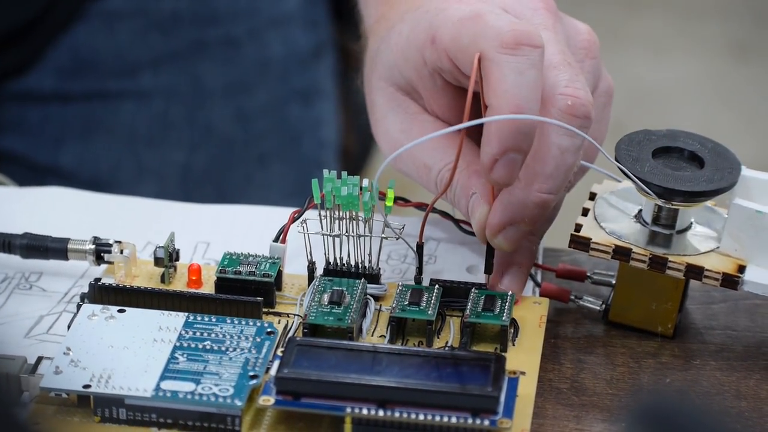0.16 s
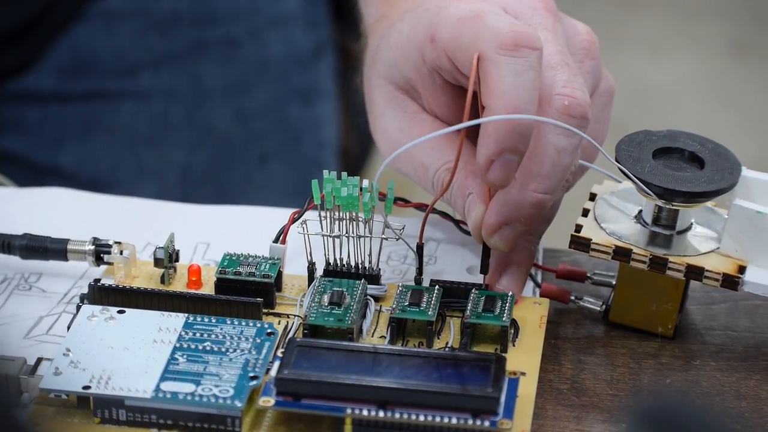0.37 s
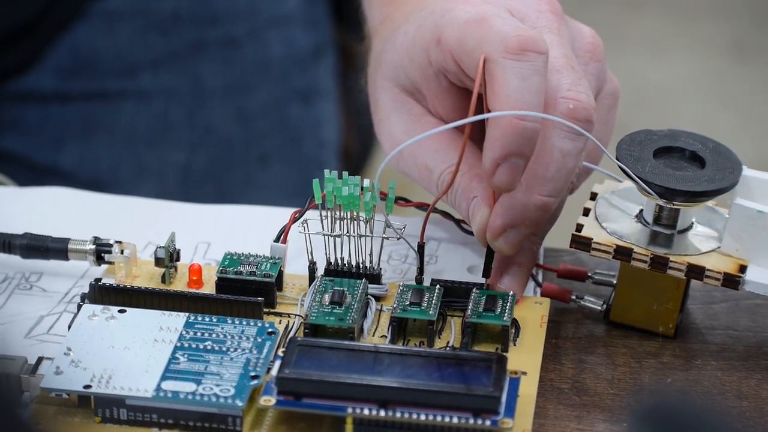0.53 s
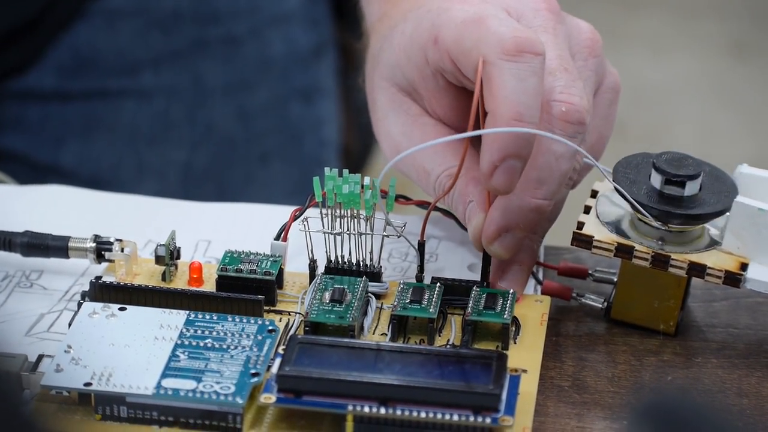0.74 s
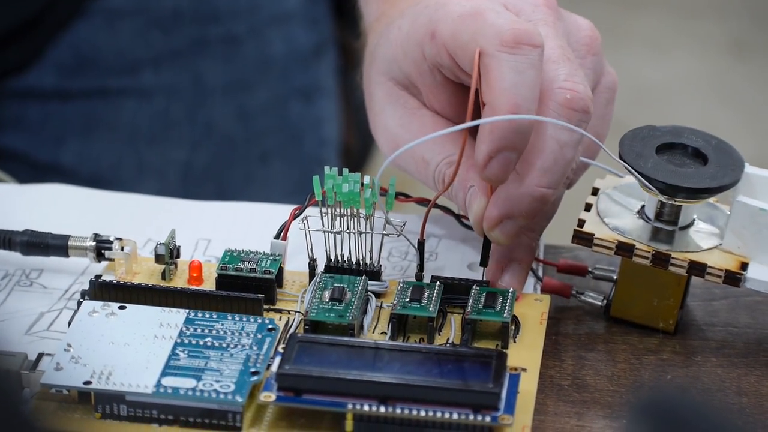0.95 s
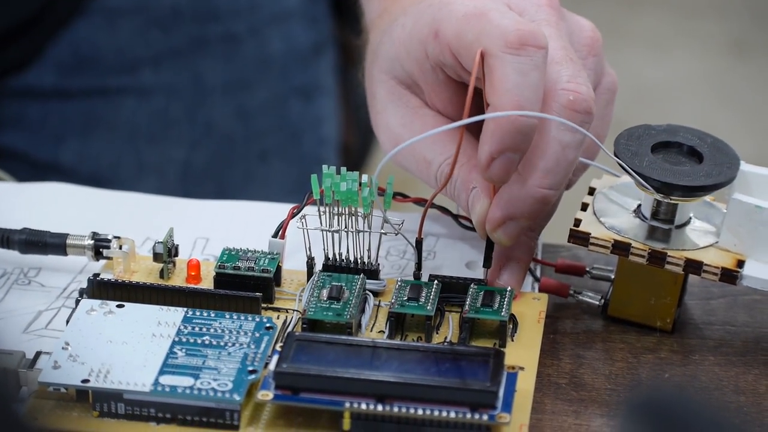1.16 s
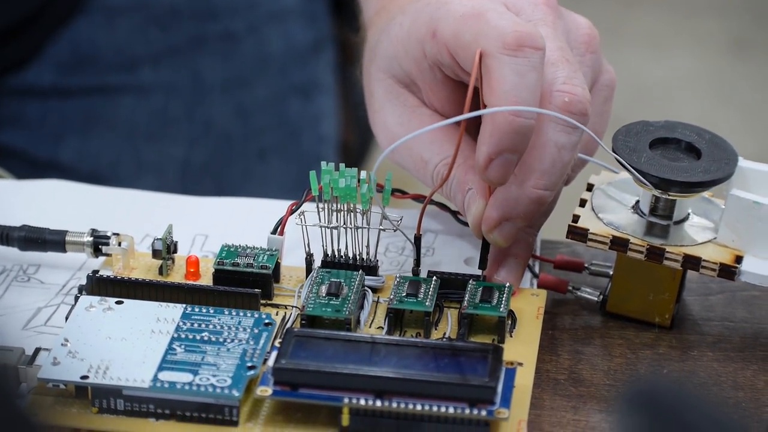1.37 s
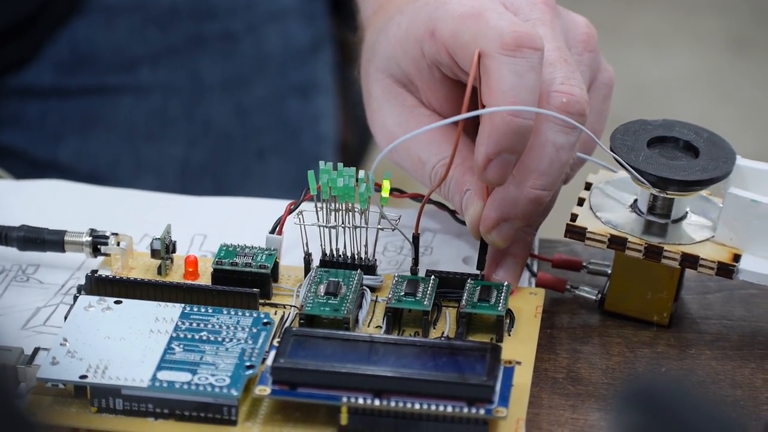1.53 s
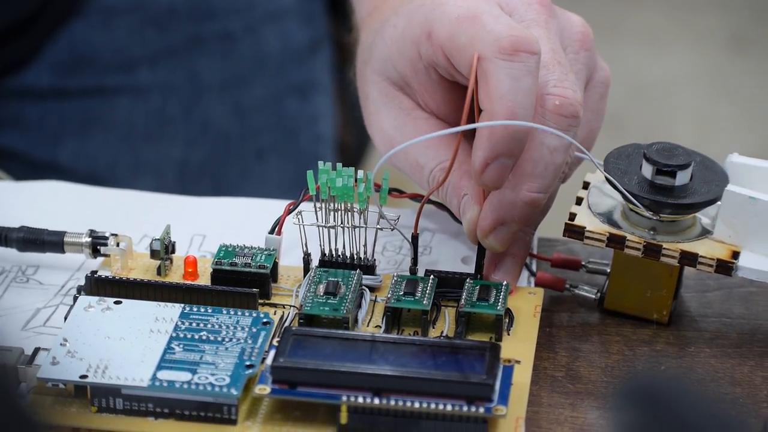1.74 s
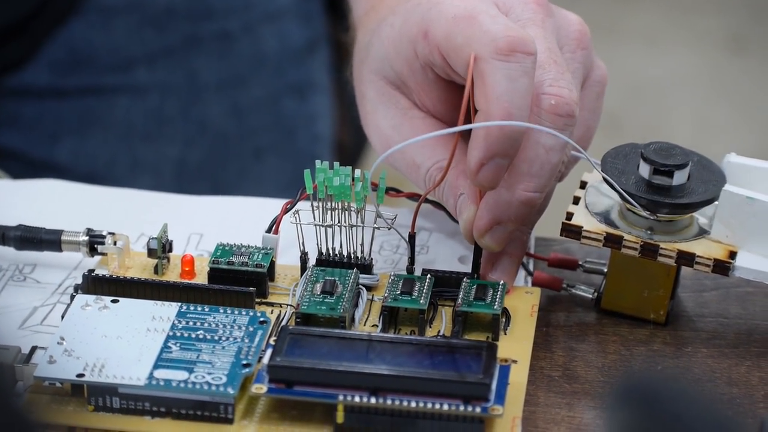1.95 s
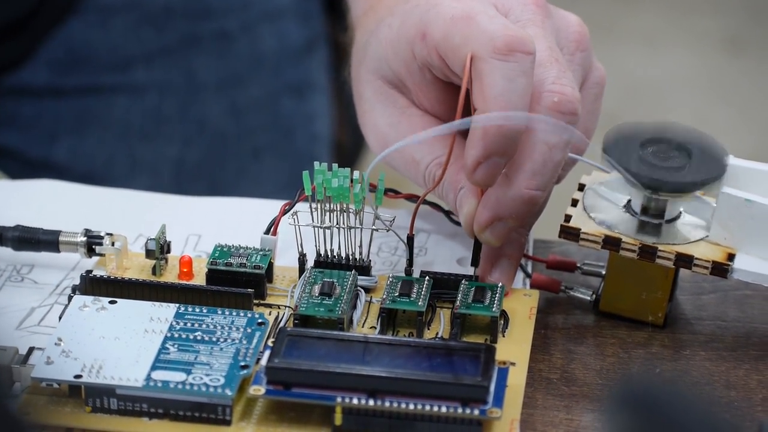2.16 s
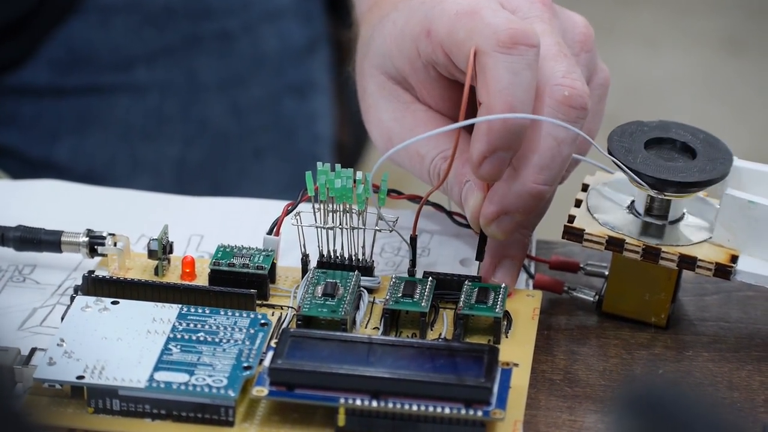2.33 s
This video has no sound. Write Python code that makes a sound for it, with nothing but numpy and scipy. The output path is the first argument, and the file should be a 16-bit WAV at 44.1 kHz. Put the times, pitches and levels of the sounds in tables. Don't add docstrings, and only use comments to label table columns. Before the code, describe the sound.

A solenoid's steel core slams home with a sharp clack and dull wooden thump, then rattles back out on release; the pair repeats a second later, close up in a quiet room with faint fan hum.

```python
import sys
import numpy as np
from scipy import signal
from scipy.fft import rfft, irfft, next_fast_len
from scipy.io import wavfile

SR = 44100
rng = np.random.default_rng(int(sys.argv[2]) if len(sys.argv) > 2 else 0)


def makeup_ratio(level_db):
    decades = np.asarray(level_db, float) / 20
    return 10 ** decades


def master(y):
    cut = np.clip(np.atleast_2d(y).T, -1, 1)
    pcm = np.round(cut * 32767)
    wavfile.write(sys.argv[1], SR, pcm.astype(np.int16))


N = 105663
GRIT_PER_S, RATTLE_PER_S = 24000, 13000


def evened(x):
    return x / np.sqrt(np.mean(x ** 2) + 1e-20)


def read(points, hz):
    table_hz, value = np.transpose(points)
    return np.interp(np.log(hz + 1), np.log(table_hz + 1), value)


def coloured(x, points):
    size = next_fast_len(len(x))
    gain = makeup_ratio(read(points, np.fft.rfftfreq(size, 1 / SR)))
    return irfft(rfft(x, size) * gain, size)[:len(x)]


def air():
    # frequency in Hz, density in dB per Hz.
    tone_spectrum = [(15, -35), (25, -22.5), (59, 2), (184, -4.5), (216, -0.5), (290, -13.5), (853, -9),
                     (1810, -23.5), (15700, -32.5)]
    # frequency in Hz, bandwidth in Hz, level in dB.
    fans = [(72, 6.1, -83), (209.6, 4, -68.5), (335, 75, -67)]
    out = makeup_ratio(-57) * evened(coloured(rng.standard_normal(N), tone_spectrum))
    hz = np.fft.rfftfreq(N, 1 / SR)
    for centre_hz, width_hz, db in fans:
        resonance = 1 / (1 + (2 * (hz - centre_hz) / width_hz) ** 2)
        hum = irfft(rfft(rng.standard_normal(N)) * resonance, N)
        out += makeup_ratio(db) * evened(hum)
    return out


def room(x):
    # frequency in Hz, t60 in s.
    decay_times = [(150, 1), (500, 0.58), (1500, 0.59), (4000, 0.52), (8000, 0.47), (15000, 0.35)]
    # frequency in Hz, level in dB.
    reflection_colour = [(140, -31), (230, 13), (1000, 2.5), (4000, 1.5), (9000, 2), (15000, 5)]
    room_db, gap_s, rise_s = -11.5, 0.0035, 0.018
    taps = np.zeros(SR)
    at = np.arange(0, SR - 20, 20) + rng.integers(0, 20, (SR - 1) // 20)
    taps[at] = rng.choice([-1., 1.], len(at))
    hz, t, z = signal.stft(taps, SR, nperseg=256)
    decay_db = -60 * t / read(decay_times, hz)[:, None]
    z = z * makeup_ratio(read(reflection_colour, hz)[:, None] + decay_db)
    tail = signal.istft(z, SR, nperseg=256)[1][:SR]
    tail = tail * np.clip((np.arange(SR) / SR - gap_s) / rise_s, 0, 1)
    return makeup_ratio(room_db) * signal.fftconvolve(x, tail / np.linalg.norm(tail))[:N]


def ring(modes, order, size, longer=1, rise=0, wave=np.sin):
    t = np.arange(size) / SR
    out = np.zeros(size)
    for k, mode in enumerate(modes):
        hz, t60 = mode[0], mode[1] * longer
        sign = (-1) ** k if rise else 1
        onset = 1 - np.exp(-(t + 1 / SR) * hz ** 2 / (100 * rise + 1e-9))
        out += sign * makeup_ratio(mode[order] - 60 * t / t60) * wave(2 * np.pi * hz * t) * onset
    return out


def grit(rate):
    spread_db = 1.7
    size = makeup_ratio(spread_db * np.minimum(rng.exponential(1, N), 4)) * rng.choice([-1., 1.], N)
    return evened(size * (rng.random(N) < rate / SR))


def steel(ringing, fizzing, strikes, rate, order, bare_db, longer=1, sheen_db=0):
    # frequency in Hz, t60 in s, then level in dB in a pull, a release, a slide.
    core_modes = [(1124, 0.0069, 12.5, 5.5, -43), (1440, 0.017, -13, -9, -43), (1842, 0.014, -3, 6, -2.5),
                  (2119, 0.026, -7, 4, -8), (2526, 0.015, 1, 7.5, -6), (3434, 0.0091, 4.5, 4, -7.5),
                  (4000, 0.0051, -8, -1.5, -22), (5823, 0.024, -9, -5, 1.5), (5890, 0.019, -18, -9.5, -16)]
    # frequency in Hz, level in dB.
    contact_spectrum = [(600, -62), (1300, -42), (2800, -24.5), (5000, -6), (7000, -13.5), (10000, -8.5),
                        (14000, -13), (16000, -9)]
    sheen_hz = 11200
    body = ring(core_modes, order=order, size=4000, longer=longer)
    rung = signal.oaconvolve(ringing * grit(rate) + strikes, body / np.linalg.norm(body))[:N]
    fizz = coloured(fizzing * grit(GRIT_PER_S), contact_spectrum)
    fizz = coloured(fizz, [(sheen_hz / 0.75, 0), (sheen_hz * 2.3, sheen_db)])
    return rung + makeup_ratio(bare_db) * 2 * fizz


def slides():
    # start in s, end in s.
    spans = [
        (.7955, .809),
        (.809, .831),
        (1.009, 1.022),
        (1.749, 1.763),
        (1.763, 1.785),
        (2.275, 2.290),
    ]
    # level at the start in dB, level at the end in dB.
    scrape_levels = [
        (-51, -58),
        (-56, -27),
        (-50.5, -29.5),
        (-60, -54),
        (-44, -38),
        (-60.5, -24),
    ]
    t = np.arange(N) / SR
    level = np.zeros(N)
    for span, ends_db in zip(spans, scrape_levels):
        level += (t > span[0]) * (t < span[1]) * makeup_ratio(np.interp(t, span, ends_db))
    return steel(level, level, 0, GRIT_PER_S, order=4, bare_db=1.5)


def bench(order, sway_db):
    # frequency in Hz, t60 in s, level in dB in a pull, in a release.
    plate_modes = [(250, 0.012, -4.5, -21), (418, 0.011, -0.5, -17), (583, 0.065, -18, -1),
                   (1149, 0.034, 11.5, -17)]
    # frequency in Hz, t60 in s, level in dB in a pull, in a release.
    wood_modes = [(161.3, 0.9, -21.5, -22), (232.7, 0.11, -18, -31), (291.2, 0.16, -7.5, -2),
                  (355.3, .15, -14, -12), (400, 0.097, -17.5, -5.5), (461, 0.078, -15, -10.5),
                  (537, 0.047, 2.5, -11.5), (622.3, 0.066, -1.5, -7.5), (696, 0.052, -8, -11),
                  (769, 0.079, -5.5, -1), (850, 0.057, 0, 5), (990, 0.032, 1.5, -4)]
    # frequency in Hz, t60 in s, level in dB in a pull, in a release.
    rocking_modes = [(105.7, 1.1, -19, -9), (108.8, .85, -14, -7), (120, .38, 0, -2)]
    knock = makeup_ratio(1) * ring(plate_modes, order=order, size=SR, wave=np.cos)
    wood = ring(wood_modes, order=order, size=SR, rise=0.24)
    sway = makeup_ratio(sway_db) * ring(rocking_modes, order=order, size=SR, rise=3.4)
    return knock + wood + sway


def blows(rows, order, longer, bare_db, rate, sway_db, sheen_db=0):
    lead_s, push_s = 0.00062, 0.00032
    fizz_longer = 1.27
    strike_db = 5
    t = np.arange(N) / SR
    ringing, fizzing, strikes, push = np.zeros((4, N))
    for s, clatter_db, thump_db, length_s in rows:
        near = slice(round(s * SR) - 400, round(s * SR) + 3000)
        u = t[near] - s
        strikes[round(s * SR)] += makeup_ratio(clatter_db + strike_db)
        ringing[near] += makeup_ratio(clatter_db) * np.exp(-abs(u) / np.where(u > 0, length_s, lead_s))
        fizzing[near] += makeup_ratio(clatter_db) * np.exp(-abs(u) / np.where(u > 0, length_s * fizz_longer, lead_s))
        push[near] += makeup_ratio(thump_db) * np.exp(-.5 * (u / push_s) ** 2) / (push_s * SR)
    clatter = steel(ringing, fizzing, strikes, rate, order, bare_db, longer, sheen_db)
    return clatter - signal.fftconvolve(push, bench(order, sway_db))[:N]


def pulls():
    # time in s, clatter level in dB, thump level in dB, clatter length in s.
    slams = [
        (.8280, -27, -37, 0.0018),
        (.8300, -13.5, -27, 0.0013),
        (.8328, -28, -20.5, 0.0029),
        (.8365, -30, -41.5, 0.0058),
        (.843, -30, -42.5, 0.0021),
        (1.7818, -20.5, -43, 0.0005),
        (1.7838, -16, -26, 0.0024),
        (1.7866, -16.5, -20, 0.00067),
        (1.790, -35, -37, 0.0098),
        (1.796, -36.5, -35.5, 0.0017),
    ]
    return blows(slams, order=2, longer=0.36, bare_db=-5, rate=GRIT_PER_S, sway_db=-7.5)


def releases():
    # time in s, clatter level in dB, thump level in dB, clatter length in s.
    bounces = [(1.0188, -26.5, -55.5, 0.0062), (1.0278, -25, -39.5, 0.0028), (1.0305, -28, -34, 0.0082),
               (1.0388, -29.5, -36, 0.0083), (1.049, -37, -36, 0.0032), (1.058, -44, -35, 0.015),
               (2.2868, -31.5, -60, 0.0091), (2.291, -33.5, -43, 0.001), (2.296, -23.5, -44, 0.0015),
               (2.300, -23.5, -63, 0.0015), (2.3075, -26, -42, 0.0064), (2.3172, -29, -35.5, 0.0017),
               (2.325, -32, -61, 0.0027), (2.336, -41, -37.5, 0.003), (2.357, -59, -46, 0.007),
               (1.535, -60.5, -77, 0.013), (2.152, -61, -51, 0.009)]
    return blows(bounces, order=3, longer=.75, bare_db=-10, rate=RATTLE_PER_S, sway_db=-13, sheen_db=3.5)


def scene():
    plunger = pulls() + slides() + releases()
    low_cut = signal.butter(4, 82, "high", fs=SR, output="sos")
    plunger = signal.sosfilt(low_cut, plunger)
    return (plunger + room(plunger) + air())[None]


def top_cut(x):
    return signal.sosfilt(signal.butter(12, 15810, fs=SR, output="sos"), x)


def record(dry):
    edge = signal.firwin(401, 15750, window=("kaiser", 9), fs=SR)
    mix = signal.oaconvolve(dry, edge[None], "same")
    return top_cut(mix)


dry = scene()
out = record(dry)
master(out)
```